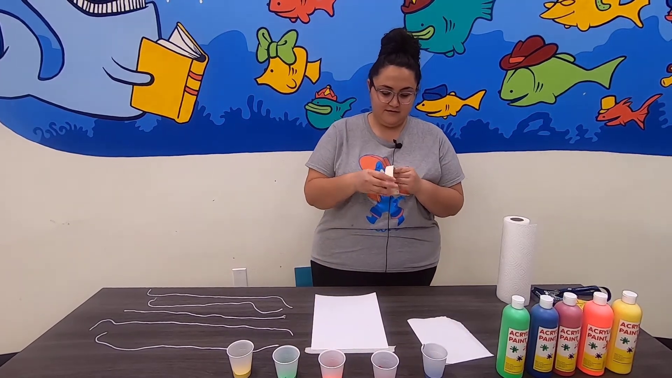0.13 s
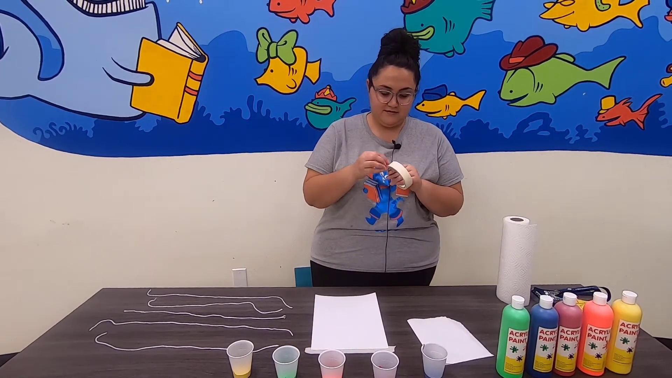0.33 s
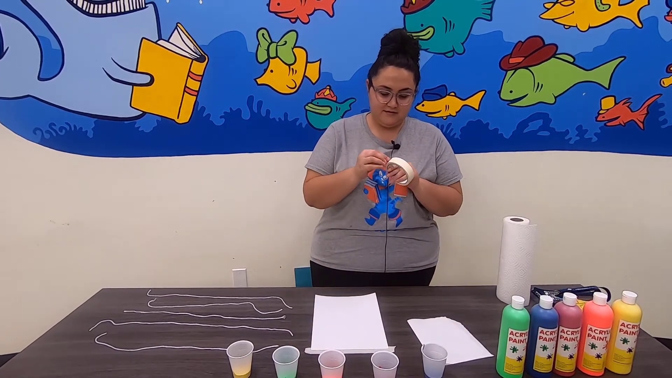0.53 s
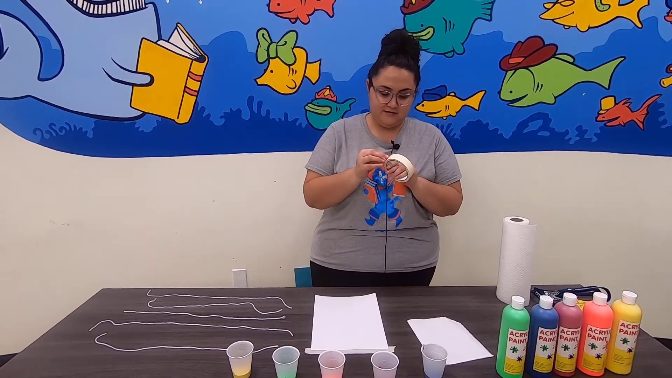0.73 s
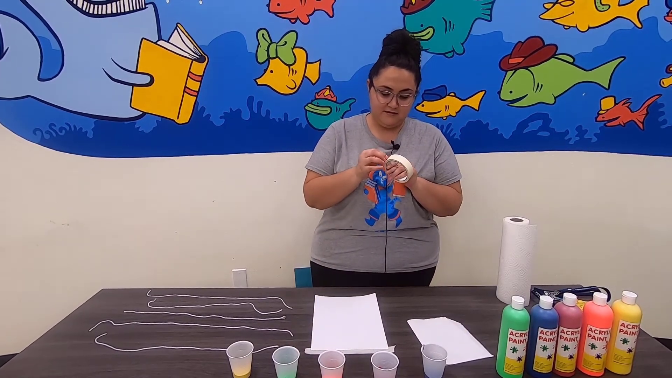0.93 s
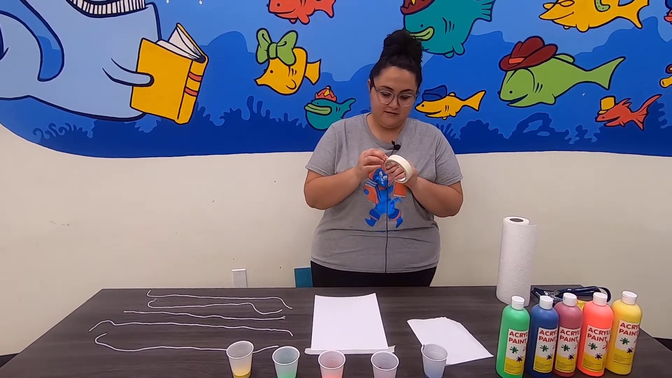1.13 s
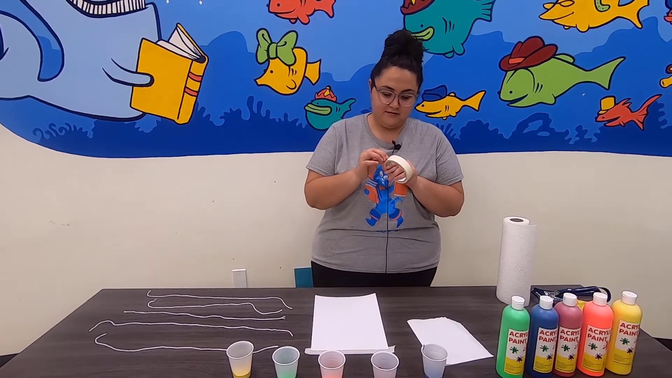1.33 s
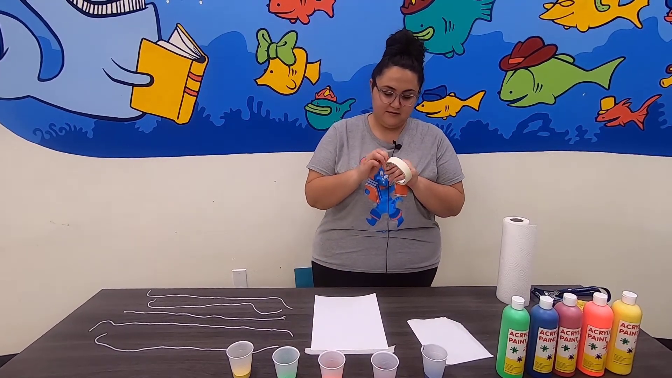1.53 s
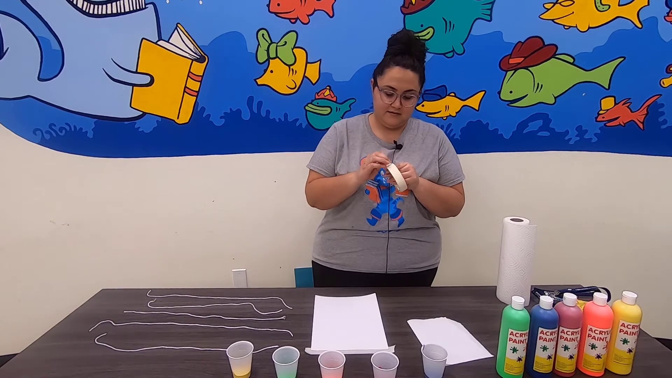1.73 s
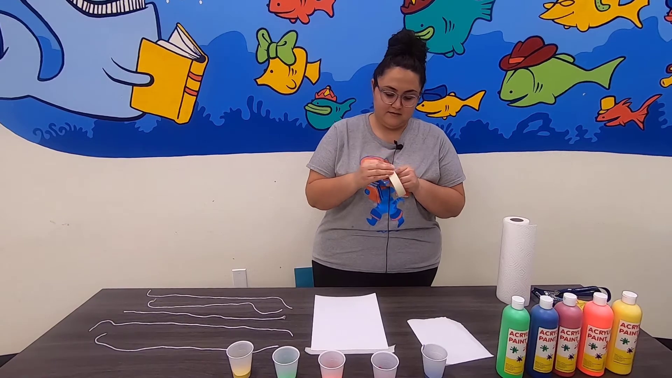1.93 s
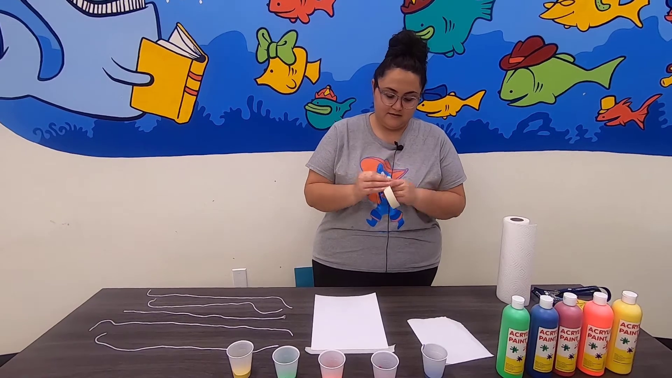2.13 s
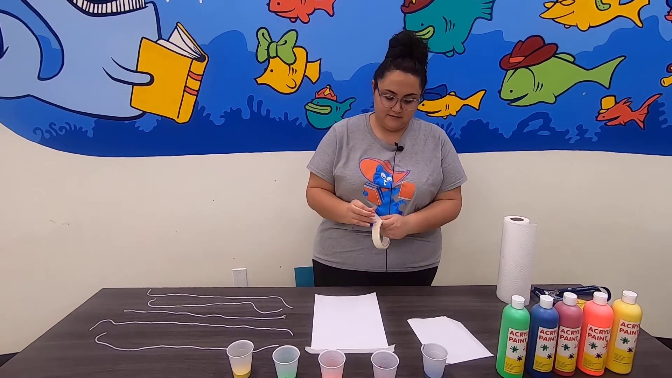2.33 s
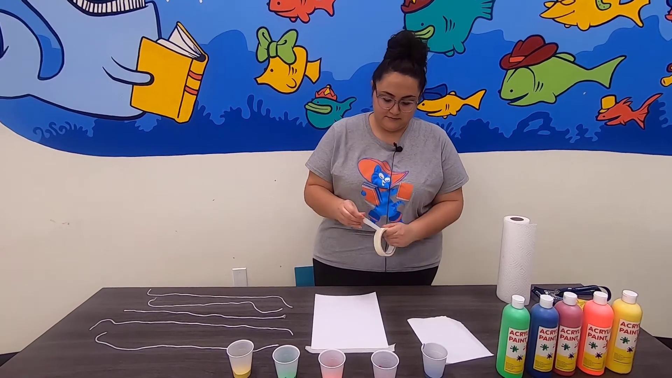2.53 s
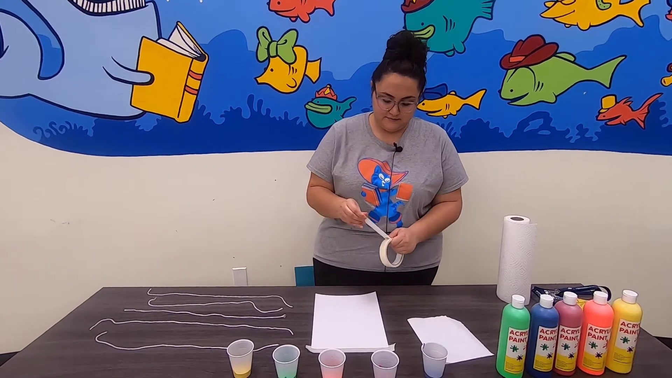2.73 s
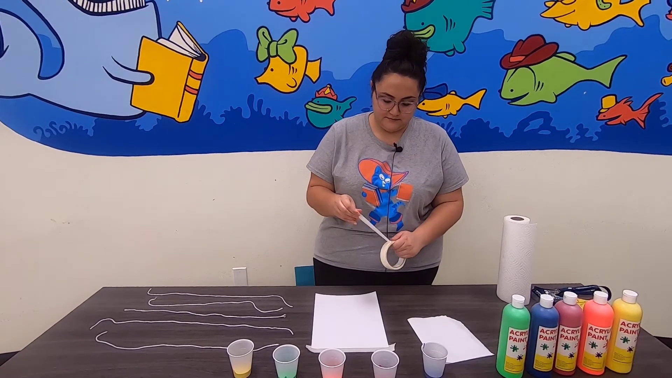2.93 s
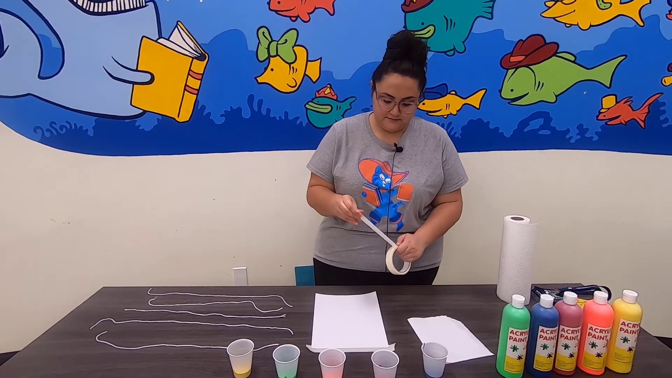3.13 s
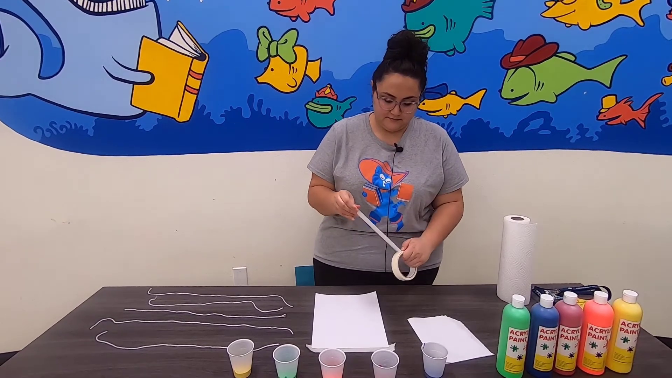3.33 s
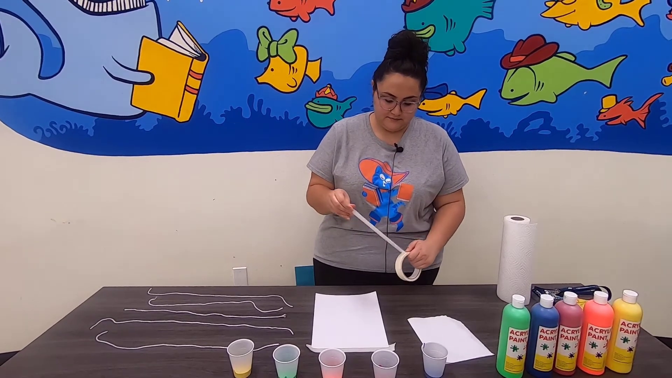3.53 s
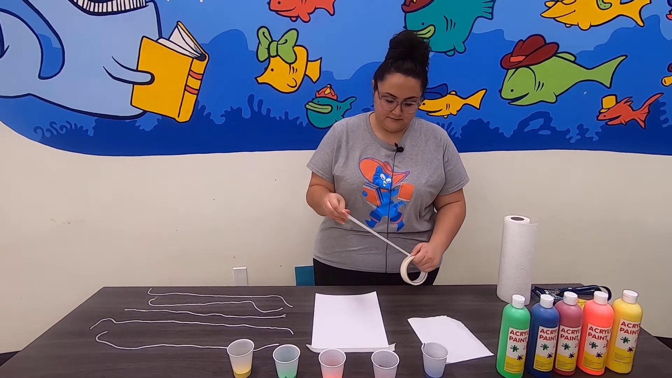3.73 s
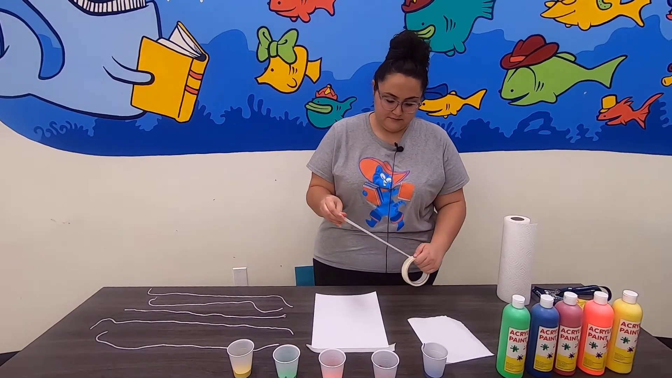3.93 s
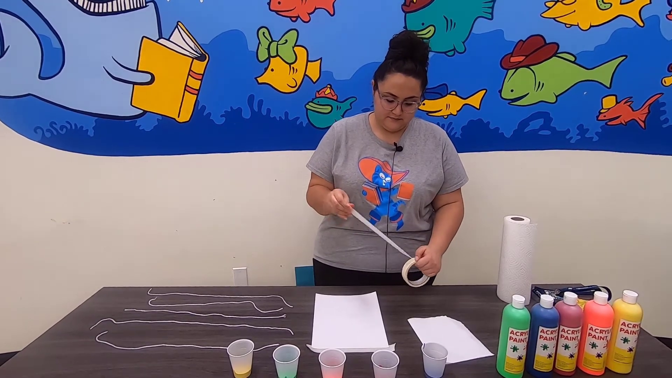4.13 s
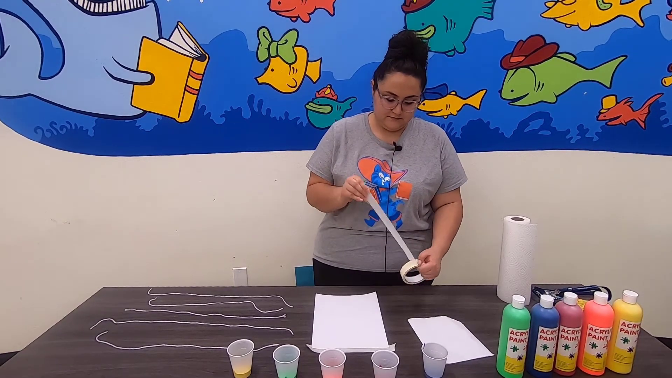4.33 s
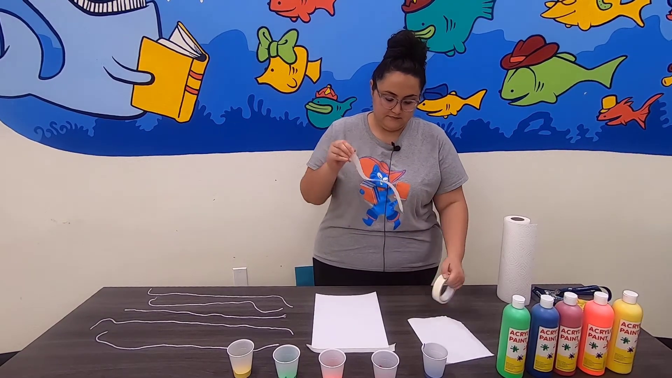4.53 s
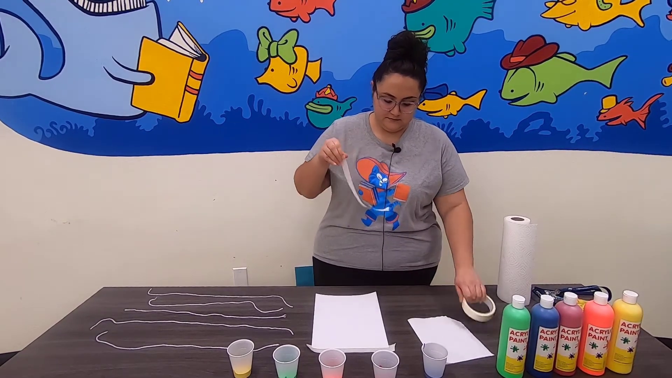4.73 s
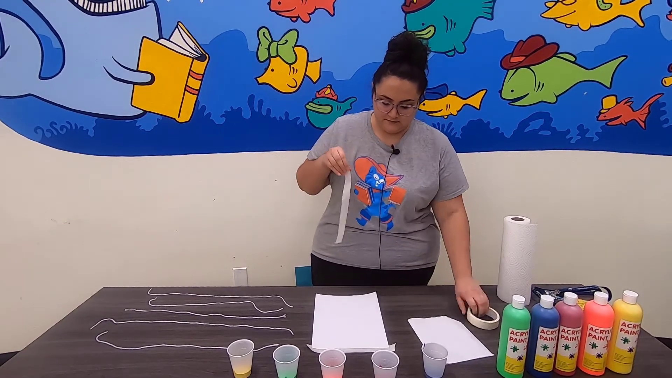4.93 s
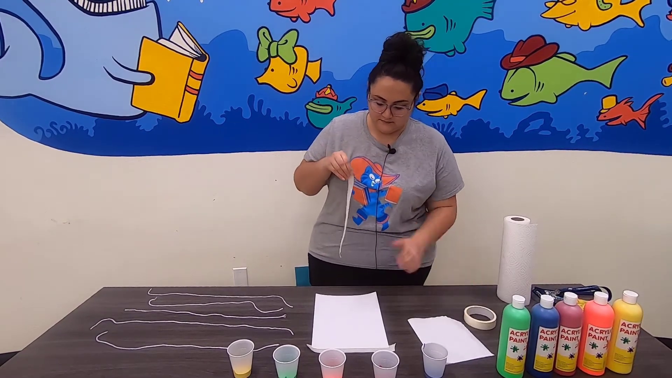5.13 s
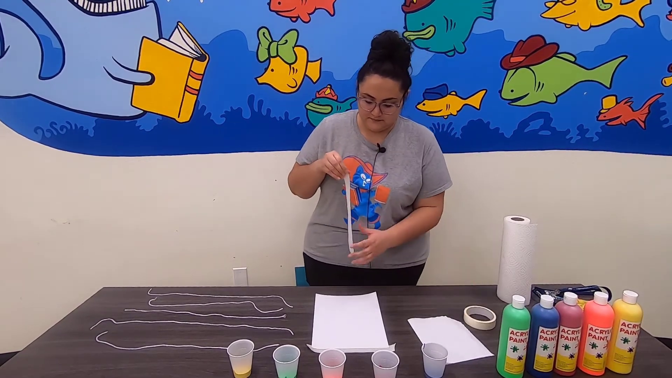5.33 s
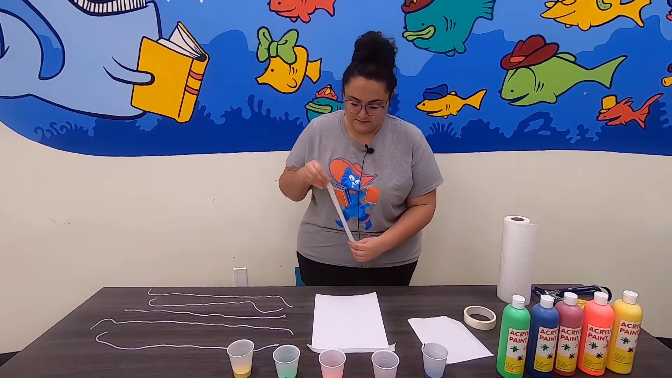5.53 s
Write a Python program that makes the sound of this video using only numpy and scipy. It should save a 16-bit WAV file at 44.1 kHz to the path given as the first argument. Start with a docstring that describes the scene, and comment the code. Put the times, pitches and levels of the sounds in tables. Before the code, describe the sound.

Close, dry tape ripping in several uneven bursts, one crisp tear, then a cardboard roll clunks and scrapes on a table in a quiet room.

```python
"""Masking tape pulled and torn

Masking tape is picked at, pulled off its roll in jerks and torn, close to a chest-worn microphone.
Short noisy snaps are mostly glue letting go; a sliding resonance makes the fingernail's squeak.
Cloth brushes as soft grains, and a small piece of metal rings faintly as a sum of dying sines.
The cardboard roll is set down and nudged on a table: blows and scraping ring its modes.
Ventilation rumbles: low resonant noise of uneven level over a steady background hiss."""
import sys
import numpy as np
from scipy import signal
from scipy.fft import rfft, irfft
from scipy.io import wavfile
from scipy.ndimage import uniform_filter1d

SR = 44100
rng = np.random.default_rng(int(sys.argv[2]) if len(sys.argv) > 2 else 0)


def pcm_store(signal):
    """Save signal as 16-bit PCM."""
    levels = np.round(np.clip(np.atleast_2d(signal), -1, 1) * 32767)
    wavfile.write(sys.argv[1], SR, levels.astype(np.int16).T)


N = 250047  # length in samples


def gain_of(db):
    """Turns decibels into a factor."""
    return 10 ** (np.asarray(db) / 20)


def evened(x):
    """Scales a sound to an average (rms) strength of 1."""
    return x / np.sqrt(np.mean(x ** 2) + 1e-20)


def read(points, hz):
    """Reads a table between its points, on a log-frequency axis."""
    f, value = np.transpose(points)
    return np.interp(np.log(hz + 1), np.log(f + 1), value)


def level(rows, column=1):
    """Turns a dB curve into a gain for each sample, silent outside its span."""
    rows = np.transpose(rows)
    db = np.interp(np.arange(N) / SR, rows[0], rows[column], left=-200, right=-200)
    return gain_of(db)


def colour(x, db_at):
    """Filters with the gain db_at(Hz), with no sound ahead of its cause (minimum phase)."""
    log_gain = np.log(gain_of(db_at(abs(np.fft.fftfreq(4096, 1 / SR)))))
    phase = -signal.hilbert(log_gain).imag
    taps = np.fft.ifft(np.exp(log_gain + 1j * phase)).real[:2048]
    return signal.oaconvolve(x, taps)[:N]


def ring(modes, detune=1):
    """A struck object rings as a sum of sines, each losing 60 dB in its own time."""
    t = np.arange(SR // 2) / SR
    return sum(gain_of(db - 60 * t / t60) * np.sin(2 * np.pi * hz * detune * t) for hz, db, t60 in modes)


def strikes(rows):
    """Places one single-sample impulse for each row of seconds and dB."""
    out = np.zeros(N)
    for s, db in rows:
        out[round(s * SR)] = gain_of(db)
    return out


def resonate(x, hz, width):
    """A moving resonance: shifts the curve hz down to zero, smooths, and shifts back."""
    turn = np.exp(2j * np.pi * np.cumsum(hz) / SR)
    r = np.exp(-np.pi * width / SR)
    smooth = signal.lfilter([1 - r], [1, -r], x / turn)
    return 2 * (turn * smooth).real


def snaps(per_s, jitter, spread_db, decay_ms, fizz, channels=1, sure=()):
    """An uneven train of short noisy rattles over a finer fizz; channels share times, not all of the size."""
    gaps = SR / per_s * np.exp(jitter * rng.standard_normal(N // 8))
    at = np.cumsum(gaps).astype(int)
    chance = rng.standard_normal((N // 8, channels + 1)).T
    sizes = gain_of(spread_db * (0.95 * chance[:1] + .9 * chance[1:]))  # shared part, own part
    train = np.zeros((channels, N))
    train[:, at[at < N]] = sizes[:, at < N]
    train[:, list(sure)] = gain_of(-4.1)  # snaps that always happen
    r = np.exp(-1000 / (decay_ms * SR))
    envelope = signal.lfilter([1], [1, -2 * r, r * r], train)  # quick rise, slower fall
    rattle = evened(envelope * rng.laplace(size=(channels, N)))
    return evened(rattle + fizz * rng.standard_normal((channels, N)))


def ventilation():
    """Low resonant noise of uneven level over a steady hiss."""
    # Uneven level of the low rumble. Each row: time in seconds, level in dB.
    rumble_level = [(0.0, -48), (0.24, -52), (0.69, -39), (1.67, -49.5), (2.13, -39), (2.56, -54),
                    (2.75, -40.5), (2.81, -52.5), (3.22, -50.5), (3.5, -38), (4.69, -53), (4.79, -42),
                    (4.89, -53.5), (5.4, -43), (5.48, -52), (5.67, -45)]
    # Duct resonances. Each row: frequency in Hz, width in Hz, relative strength in dB.
    duct = [(29.73, 12, 2.5), (55.6, 13, -15.5), (84, 26.3, -15.5), (117.4, 17, 0.5), (172.8, 15, -3),
            (213.5, 18, -22.5)]
    # Colour of the background hiss, dull, ahead of a low cut; above 12 kHz the sound falls away steeply. # Each
    # row: frequency in Hz, relative strength in dB.
    hiss_tone = [(200, 8), (242, -2.5), (386, -7.5), (928, -18), (2060, -27.5), (4000, -29.5),
                 (6900, -32.5), (7900, -33), (12000, -40), (13000, -64)]
    hiss_db = -68
    hz = np.fft.rfftfreq(N, 1 / SR)
    peaks = sum(gain_of(db) / (1 + (2 * (hz - f) / width) ** 2) for f, width, db in duct)
    wide = gain_of(-33) / (1 + (hz / 210) ** 8)
    rumble = evened(irfft(rfft(rng.standard_normal(N)) * (peaks + wide), N))
    low_cut = 1 / (1 + (230 / (hz + 1)) ** 8)
    hiss = irfft(rfft(rng.standard_normal(N)) * gain_of(read(hiss_tone, hz)) * low_cut, N)
    return rumble * level(rumble_level) + evened(hiss) * gain_of(hiss_db)


def shares(thump_db, bright_db):
    """Gains of the low thump, the middle and the treble."""
    middle = 1 / np.sqrt(1 + gain_of(2 * bright_db))
    return np.array([gain_of(thump_db) + 0 * middle, middle, middle * gain_of(bright_db)])


def bursts_and_tear(thump_db, bright_db):
    """Growing bursts of snaps, mostly glue letting go; the tear is a crack, then a rasp."""
    # Short noisy snaps, mostly glue letting go, with a few faint ticks.
    # Each row: start in seconds, length in ms, level in dB before filtering.
    bursts = [(0.8419, 1.6, -45.5), (1.581, 6.3, -48.5), (1.595, 11, -51), (1.613, 3.7, -47.5),
              (1.7882, 2.8, -60.5), (2.1834, 6.6, -63), (2.2572, 13, -47.5), (2.2929, 3.8, -21),
              (2.3041, 19.5, -10.5), (2.3307, 16.8, -10.5), (2.35, 1.6, -16), (2.3603, 15.6, -12),
              (2.3814, 17.5, -16), (2.4053, 20.9, -16), (2.4326, 6.4, -27), (2.448, 11, -23),
              (2.4607, 9.7, -24.5), (2.594, 7.6, -42), (2.6395, 17.6, -22.5), (2.668, 11.1, -23.5),
              (2.6998, 4.07, -31.5), (2.7124, 2.1, -44.5), (2.7597, 3.2, -22), (2.7745, 9.2, -35.5),
              (2.7965, 12, -31), (2.8194, 1.9, -33), (2.8393, 3.6, -22), (2.847, 12, -20.5),
              (2.863, 2.2, -38), (2.8873, 11.7, -15.5), (2.9285, 11.55, -20.5), (3.101, 5.7, -43),
              (3.1223, 12.4, -29.5), (3.1348, 8.1, -27.5), (3.163, 2, -46), (3.246, 10.7, -34.5),
              (3.2566, 7.9, -30), (3.2914, 10.3, -20.5), (3.32, 14, -29.5), (3.3323, 16, -20.5),
              (3.3658, 11.9, -19.5), (3.4139, 7.5, -33.5), (3.426, 18.7, -45), (3.458, 8.5, -52),
              (3.5264, 13, -24.5), (3.555, 7.3, -30), (3.5692, 13.7, -22.5), (3.6018, 15.5, -31),
              (3.6177, 17, -32), (3.641, 5.8, -42), (3.659, 2.7, -48.5), (3.8218, 13, -61.5),
              (3.995, 3.24, -65), (4.089, 3.3, -68), (4.935, 2.37, -71), (5.53, 1.86, -78.5)]
    # Growth within a burst, least in the fastest pull. Each row: time in seconds, growth in dB.
    growth = [(2.3, 10.5), (2.36, 5), (2.45, 8.5), (2.7, 8), (3.3, 12.5)]
    # The strip is torn across. Each row: start in seconds, length in ms, level in dB before filtering,
    # growth in dB (negative dies away).
    tear = [(4.3892, 1.5, -8.5, -6), (4.3908, 13, -21.5, -8)]
    tear_lead_db = -20  # paper tears with far less warning than glue gives
    faint_db, brighter_per_db = -28, 0.57  # bursts under this level are thinner and brighter
    lead = 200  # samples of quiet build-up ahead of each start

    rows = [(*row, np.interp(row[0], *np.transpose(growth))) for row in bursts]
    rows += tear
    # each burst surely has a snap near its start and one near its end
    sure = [round((s + share * ms / 1000) * SR) for s, ms, *_ in rows for share in (.2, .88)]
    volley = snaps(per_s=500, jitter=.3, spread_db=3.0, decay_ms=0.16, fizz=.5, channels=3, sure=sure)
    drive = np.zeros((3, N))
    for s, ms, db, growth_db in rows:
        n = max(round(ms / 1000 * SR), 20)
        a = round(s * SR) - lead
        span = slice(a, a + lead + n)
        warning_db = np.linspace(-22, 0, lead) - abs(growth_db) / 2
        if growth_db < 0:
            warning_db += tear_lead_db
        body_db = np.linspace(-.5, .5, n) * growth_db
        shape = gain_of(np.r_[warning_db, body_db] + db)
        extra_bright_db = brighter_per_db * max(faint_db - db, 0)
        split = shares(thump_db[a], bright_db[a] + extra_bright_db)
        drive[:, span] += evened(volley[:, span]) * shape * split[:, None]
    return drive


def fine_crackle(bright_db):
    """Fine crackle around each pull and the tear, with a set fade in and out."""
    # Stretches of crackle. Each row: start in seconds, end in seconds, level in dB before filtering.
    stretches = [(1.606, 1.634, -62), (2.313, 2.408, -36), (2.633, 2.864, -46), (3.101, 3.184, -51.5),
                 (3.28, 3.38, -45), (3.501, 3.631, -51.5), (3.724, 3.859, -75), (4.387, 4.42, -58.5)]
    fade_in_db_per_s, fade_out_db_per_s = 252.5, 185
    crackle = snaps(per_s=520, jitter=1.0, spread_db=3, decay_ms=.2, fizz=0.95, channels=3)
    t = np.arange(N) / SR
    strength = np.zeros(N)
    for start, end, db in stretches:
        before, after = np.maximum(start - t, 0), np.maximum(t - end, 0)
        strength += gain_of(db - fade_in_db_per_s * before - fade_out_db_per_s * after)
    return crackle * strength * shares(-16.5, 4.5 + bright_db)


def tape():
    """Snaps, tear and crackle drive the thump of the strip, its middle and its treble by their own shares."""
    # The free strip as its length and tension change. Each row: time in seconds, thump pitch in Hz,
    # thump share of bursts and tear in dB, treble against middle in dB before later additions.
    strip = [(.84, 1200, -18, 23), (1.6, 1200, -31, -1), (2.31, 1200, -30.5, 4), (2.34, 1160, -13, -3),
             (2.46, 1080, -31, 10.5), (2.65, 870, -8.5, -6), (2.78, 1130, -29, 0.5), (2.9, 990, -7, -2.5),
             (3.13, 920, -6, -4), (3.25, 920, -12, 0.5), (3.33, 930, -8, -8), (3.54, 1214, -3.5, -2.5),
             (3.65, 1270, -9, -2.5), (4.39, 1350, -18.5, -3)]
    # Colour of one snap. Each row: frequency in Hz, gain in dB.
    snap_tone = [(300, -11.5), (600, -4.5), (1100, -9.5), (1700, -7), (2300, -5.5), (3400, -2.5),
                 (5500, -2), (8000, -4), (11000, 2), (13000, -3), (15500, -15)]
    times, *columns = np.transpose(strip)
    thump_hz, thump_db, bright_db = (np.interp(np.arange(N) / SR, times, c) for c in columns)
    drive = bursts_and_tear(thump_db, bright_db) + fine_crackle(bright_db)
    low = gain_of(13.5) * resonate(drive[0], thump_hz, 640) + gain_of(2) * drive[0]
    # three bands: below 1900 Hz, from 2500 to 7000 Hz, above 7000 Hz, all with soft borders
    low = colour(low, lambda hz: -12 * np.log10((1 + (hz / 1900) ** 8) * (1 + (240 / (hz + 1)) ** 4)))
    middle = colour(drive[1], lambda hz: 6 - 8 * np.log10(
        (1 + (2500 / (hz + 1)) ** 8) * (1 + (hz / 7000) ** 6)))
    high = colour(drive[2], lambda hz: 5 - 8 * np.log10(1 + (7000 / (hz + 1)) ** 8))
    return colour(low + middle + high, lambda hz: read(snap_tone, hz))


def past_roll(x):
    """Inverted repeats leave peaks at odd multiples of half the comb spacing, which drifts as the hands move."""
    # Comb spacing of the short path past the roll. Each row: time in seconds, middle spacing in Hz.
    spacings = [(2.3, 2240), (2.9, 2330), (3.3, 2310), (3.6, 2356), (4.39, 2290)]
    strength, top_hz, wander = .55, 12000, .035  # depth 0-1, where it fades, jerky drift as a share
    hz, t, z = signal.stft(x, SR, nperseg=1024, noverlap=768)
    drift = evened(uniform_filter1d(rng.standard_normal(len(t)), size=4))
    spacing = np.interp(t, *np.transpose(spacings)) * (1 + wander * drift)
    depth = strength / (1 + (hz[:, None] / top_hz) ** 4)
    comb = 1 / (1 + depth * np.exp(-2j * np.pi * hz[:, None] / spacing))
    return signal.istft(z * comb, SR, nperseg=1024, noverlap=768)[1][:N]


def rustle():
    """Cloth and fingers brush: soft, dense, uneven grains of coloured noise."""
    # Strength of the brushing. Each row: time in seconds, level in dB.
    brushes = [(1.1, -86), (1.136, -67), (1.176, -63.5), (1.45, -83)]
    # Its colour. Each row: frequency in Hz, gain in dB.
    tone = [(400, 7.5), (1000, 5), (2000, -7), (4000, -1.5), (7000, -11), (12500, -27)]
    grains = snaps(per_s=2000, jitter=.9, spread_db=3, decay_ms=.8, fizz=0.9)[0]
    return evened(colour(grains, lambda hz: read(tone, hz))) * level(brushes)


def jingle():
    """Thin metal is touched and rings faintly; close modes beat and the ring rattles unevenly."""
    # Touches of a small piece of metal. Each row: time in seconds, strength in dB.
    touches = [(1.352, -89), (1.651, -67.5), (1.868, -86.5)]
    # Its ringing modes. Each row: frequency in Hz, strength in dB, time to fall by 60 dB in seconds.
    metal = [(1868, -2.5, 0.22), (2070, -4.5, 0.32), (3580, 13.5, 0.13), (4580, -1, .3), (5730, 2.5, 0.33),
             (8400, 2, 0.37), (8050, -5, 0.53), (11800, 11, 0.087), (12700, -14, .3), (15200, -14, 0.28)]
    body = ring(metal) + .7 * ring(metal, detune=1.008) + .5 * ring(metal, detune=.994)
    soft_start = 1 - np.exp(-np.arange(len(body)) / SR / 0.0045)
    wobble = evened(uniform_filter1d(rng.standard_normal(len(body)), size=110))
    return signal.oaconvolve(strikes(touches), body * soft_start * (1 + 0.64 * wobble))[:N]


def pick():
    """A fingernail squeaks on the tape end: scratchy grains in a sliding resonance, twice for steep sides."""
    # The nail catches the tape end. Each row: time in seconds, level in dB, pitch in Hz.
    squeak = [(1.59, -66, 3870), (1.606, -48, 4700), (1.615, -46.5, 3830), (1.635, -53.5, 3750),
              (1.66, -74, 3450)]
    s, _, hz = np.transpose(squeak)
    hz = np.interp(np.arange(N) / SR, s, hz)
    scratch = snaps(per_s=1000, jitter=0.51, spread_db=5, decay_ms=1.0, fizz=0.57)[0]
    squeal = resonate(resonate(scratch, hz, 560), hz, 560)
    return evened(squeal) * level(squeak)


def table():
    """Rough blows and a grainy slide ring the same cardboard roll."""
    # The roll meets the table. Each row: time in seconds, blow strength in dB, rim against core in dB.
    knocks = [(4.819, -24, -0.5), (4.849, -40.5, 2), (4.99, -51, -8), (5.06, -56.5, 3), (5.135, -57, -4.5),
              (5.176, -52, 7), (5.214, -49.5, 10.5)]
    # The roll scrapes along. Each row: time in seconds, strength into the modes in dB, rim share in dB.
    slide = [(4.75, -92.5, -5.5), (4.826, -85, 8.5), (4.9, -89, 14.5), (4.98, -86, -19),
             (5.078, -86.5, -9.5), (5.19, -82.5, -1.5), (5.25, -90, 16.5), (5.33, -104, 9), (5.42, -110, 5)]
    # Ringing of the roll's low core, its rim and its hard edge.
    # Each row: frequency in Hz, strength in dB, time to fall by 60 dB in seconds.
    core_modes = [(290, -17, .05), (430, -12, .06), (590, 0, .1), (700, -8, .05)]
    rim_modes = [(1018, -3, 0.02), (1166, -3, 0.02), (1338, -2.5, 0.028), (1558, -16, 0.046)]
    edge_modes = [(3730, 1, 0.025), (5400, -1, 0.0034), (8000, -13, 0.0025)]
    chatter_ms = 9.5  # time in which a blow falls to about a third
    tick_db, tick_per_db = -15.5, 1.16  # the edge ticks more when hit harder

    scrape = snaps(per_s=300, jitter=.6, spread_db=3, decay_ms=1.1, fizz=1.2)[0] * level(slide)
    core, rim = scrape.copy(), scrape * level(slide, column=2)
    t = np.arange(3000) / SR
    for s, db, rim_db in knocks:
        blow = rng.standard_normal(len(t)) * np.exp(-t * 1000 / chatter_ms)
        # the first contact is firm in a hard blow, the rest chatters
        firmness = 1.4 if db > -30 else .5
        blow[0] += firmness * np.linalg.norm(blow)
        blow *= gain_of(db) / np.linalg.norm(blow)
        core[round(s * SR):][:len(t)] += blow
        rim[round(s * SR):][:len(t)] += blow * gain_of(rim_db)
    # cardboard lands softly
    core, rim = (colour(x, lambda hz: -14 * np.log10(1 + (hz / 1800) ** 8)) for x in (core, rim))
    ticks = strikes([(s, tick_db + tick_per_db * db) for s, db, _ in knocks])
    pairs = [(core, core_modes), (rim, rim_modes), (ticks, edge_modes)]
    return sum(signal.oaconvolve(x, ring(modes))[:N] for x, modes in pairs)


def room(x):
    """The room answers with a noise tail whose bands die at their own speeds, after a short gap."""
    # How long the room rings. Each row: frequency in Hz, time to fall by 60 dB in seconds.
    decay = [(300, 0.15), (1000, 0.343), (4000, .28), (10000, 0.15), (16000, 0.19)]
    hz, t, z = signal.stft(rng.standard_normal(SR // 2), SR, nperseg=256)
    tail = signal.istft(z * gain_of(-60 * t / read(decay, hz)[:, None]), SR, nperseg=256)[1]
    tail *= 1 + 5 * np.exp(-np.arange(len(tail)) / SR / 0.015)  # stronger early reflections
    tail[:100] = 0
    return signal.oaconvolve(x, tail / np.linalg.norm(tail))[:N]


def scene():
    """All sources reach one microphone; the far table carries more room than the near tape."""
    near, far = past_roll(tape()), table()
    mix = near + far + room(gain_of(-12.5) * near + gain_of(-6) * far)
    mix += pick() + jingle() + rustle() + ventilation()
    return np.array([mix, mix])


def record(dry):
    """The two channels differ by a slightly delayed trace; loud snaps are softly limited; then the band limit."""
    edge_hz = 15900  # top of the band
    trace = gain_of(-27) * np.roll(dry[0], 331) * np.array([[1], [-1]])  # added left, taken away right
    limited = .82 * np.tanh((dry + trace) / .82)
    taps = signal.firwin(767, edge_hz, window=("kaiser", 13), fs=SR)
    return signal.oaconvolve(limited, taps[None], "same")


dry = scene()
out = record(dry)
pcm_store(out)
```